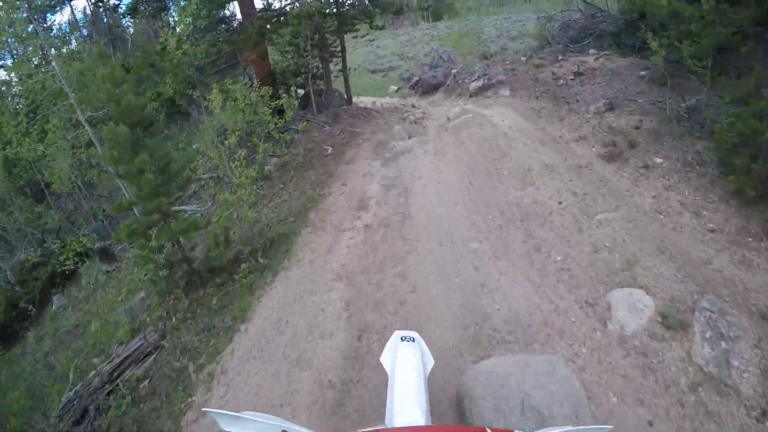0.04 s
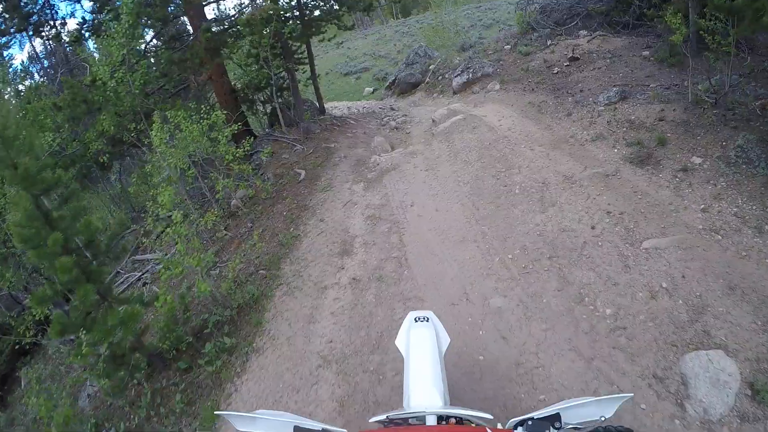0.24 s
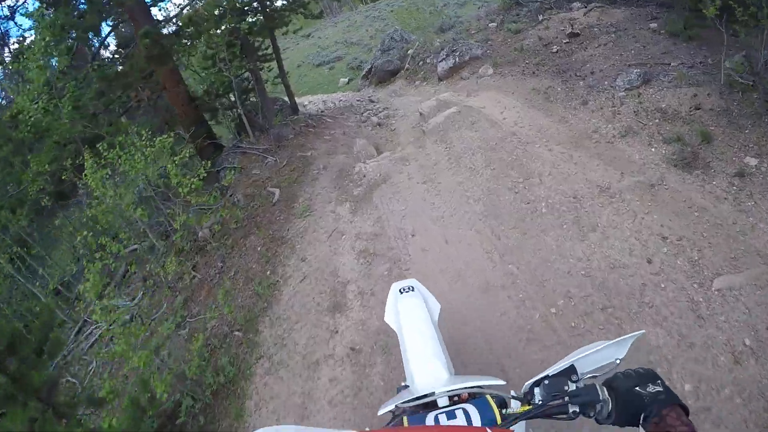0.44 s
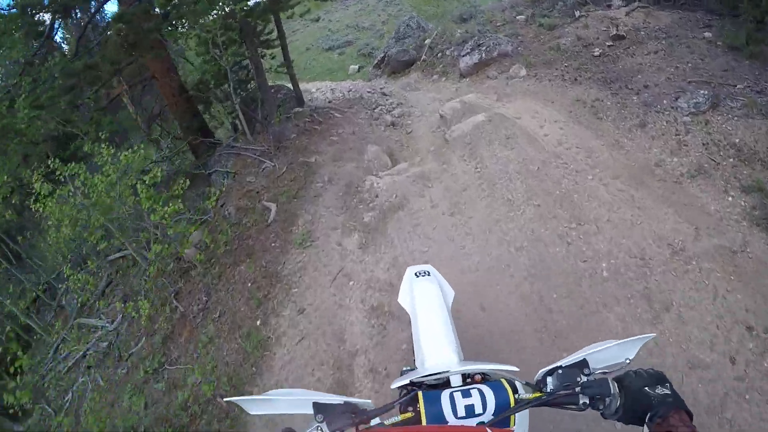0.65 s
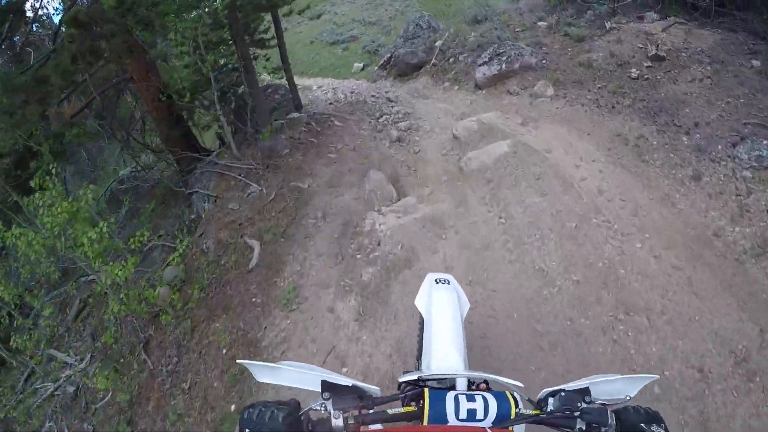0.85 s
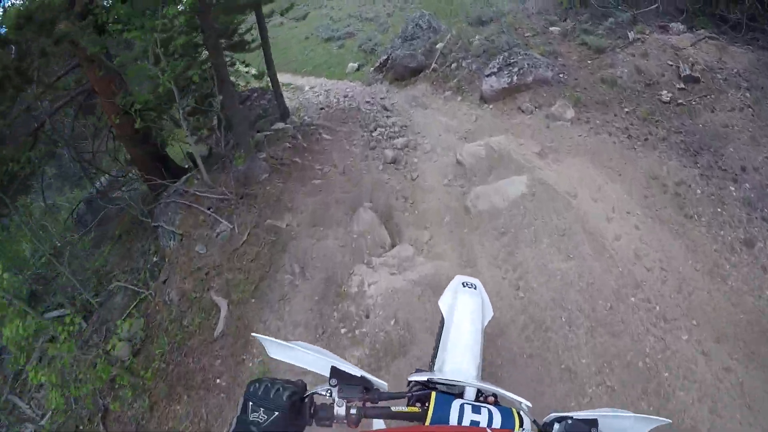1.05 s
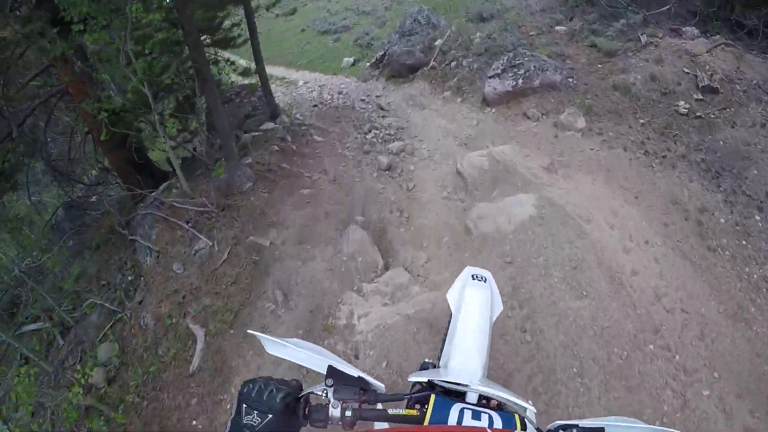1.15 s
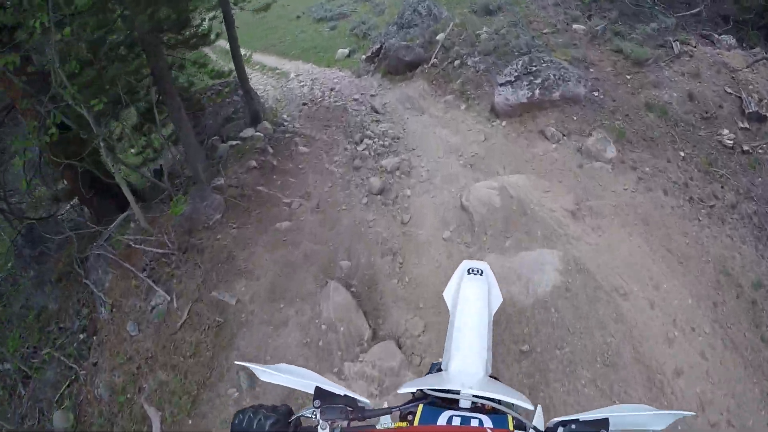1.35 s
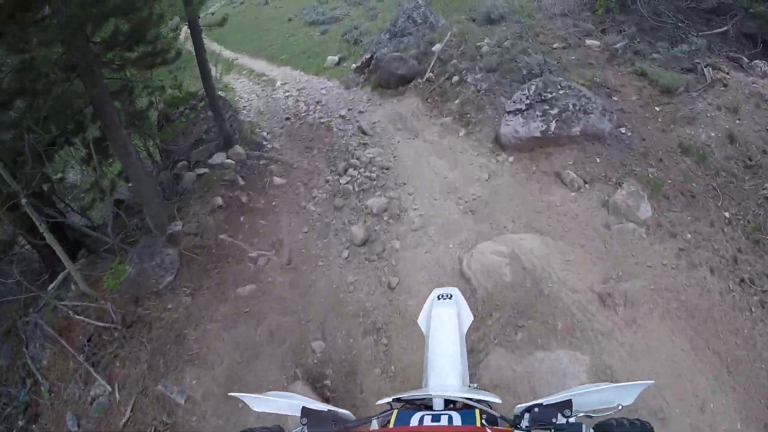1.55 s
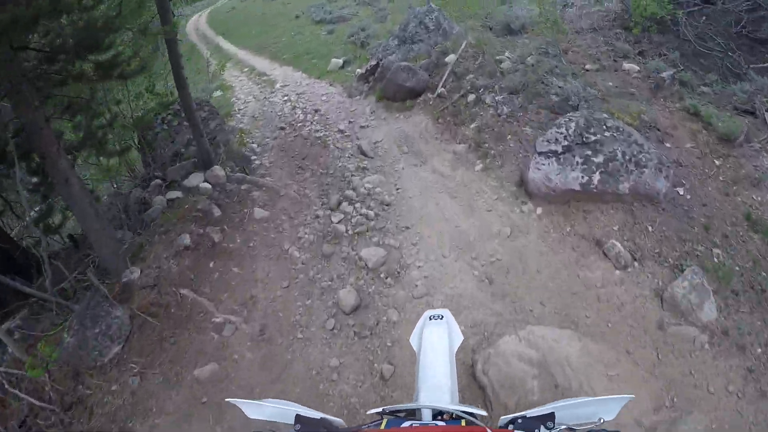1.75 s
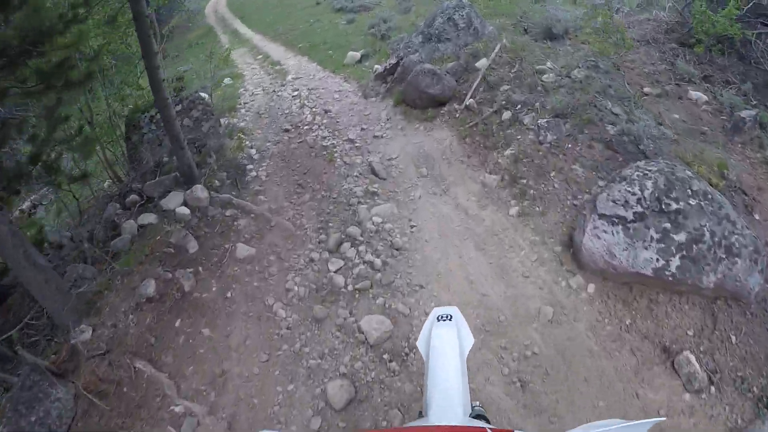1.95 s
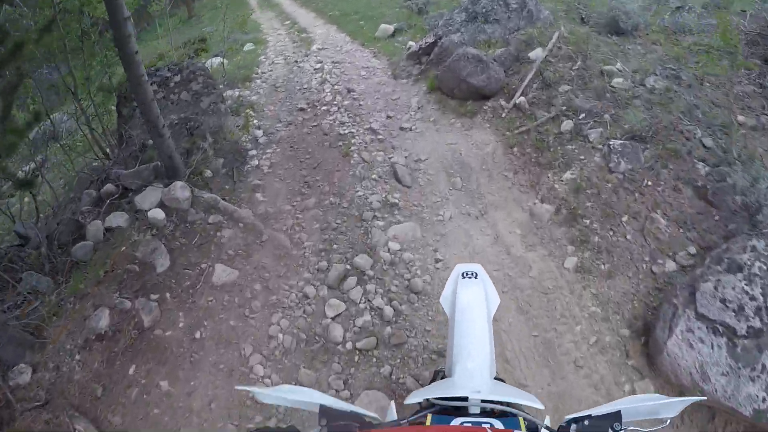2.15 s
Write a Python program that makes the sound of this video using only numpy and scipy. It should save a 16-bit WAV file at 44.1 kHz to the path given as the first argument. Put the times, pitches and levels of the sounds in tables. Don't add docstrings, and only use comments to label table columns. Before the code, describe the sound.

A one-cylinder dirt bike engine putters steadily near idle, with low hum, soft exhaust pops and metallic valve clatter; quick plastic knocks open it, and gravel crunches louder near the end, heard from a helmet-mounted cased microphone.

```python
import sys
import numpy as np
from scipy import signal
from scipy.fft import rfft, irfft
from scipy.io import wavfile

SR = 44100
rng = np.random.default_rng(int(sys.argv[2]) if len(sys.argv) > 2 else 0)


def int16_out(signal):
    q = np.round(np.clip(np.atleast_2d(signal).T, -1, 1) * 32767)
    wavfile.write(sys.argv[1], SR, q.astype(np.int16))


def gain_from_db(level_db):
    decades = np.asarray(level_db, float) / 20
    return 10 ** decades


N = 96711

# (time [s], level [dB])
FACING_ENGINE = [(0, 3.5), (.25, 4), (.5, 2), (.75, 4), (1.0, 0.6), (1.5, 2.25), (1.75, 1), (2.19, 4.2)]
# (time [s], level [dB])
BUFFETING = [(0, -1.), (.12, -1), (.3, 3), (.5, -0.5), (.7, 3.5), (.95, -3.), (1.15, 0.5), (1.4, -2),
             (1.72, 0.5), (1.95, -1.5), (2.19, 2)]


def evened(x):
    return x / np.sqrt(np.mean(x ** 2) + 1e-20)


def curve(rows):
    s, value = np.transpose(rows)
    return np.interp(np.arange(N) / SR, s, value)


def colour(x, points):
    f, db = np.transpose(points)
    hz = np.fft.rfftfreq(len(x), 1 / SR) + 1
    octaves_past_end = np.log2(np.maximum(hz / f[-1], 1))
    gain_db = np.interp(np.log(hz), np.log(f), db) - 11.5 * octaves_past_end
    return evened(irfft(rfft(x) * gain_from_db(gain_db), len(x)))


def drift(rate_hz):
    t = np.arange(N) / SR
    return evened(sum(np.sin(2 * np.pi * (f * t + rng.random())) for f in rate_hz * np.linspace(.1, 1, num=12)))


def ring(x, hz, width_hz):
    r = np.exp(-np.pi * width_hz * 1.5 / SR)
    poles = [1, -2 * r * np.cos(2 * np.pi * hz / SR), r * r]
    once = signal.lfilter([1], poles, x)
    return signal.lfilter([1], poles, once)


def cycles():
    # (time [s], speed [rpm])
    speed = [(0, 2191), (.15, 2110), (.29, 2060), (.44, 2078), (.58, 2081), (.73, 1988), (.88, 2042),
             (1.02, 2050), (1.17, 2003), (1.31, 2009), (1.46, 1995), (1.61, 2013), (1.75, 2012),
             (1.9, 1949), (2.04, 2030), (2.19, 1987)]
    first_cycle = -.5883
    return first_cycle + np.cumsum(curve(speed)) / 120 / SR


def passes(c):
    return np.diff(np.floor(c), prepend=np.floor(c[0]))


def hiss():
    tone = [(3000, 4.5), (6000, -5), (9000, -5.5), (15000, -12)]  # Hz, dB
    return gain_from_db(-66) * colour(rng.standard_normal(N), tone)


def whine():
    return gain_from_db(-83) * evened(ring(rng.standard_normal(N), hz=8575, width_hz=45))


def wind():
    # (frequency [Hz], level [dB per Hz])
    wind_tone = [(8, 1.5), (22, -1.5), (45, -1.5), (100, -4.5), (115, -14), (150, -15.5), (172, -28.5),
                 (430, -29.5)]
    gusts_db = 0.37 * curve(BUFFETING) + 1.2 * drift(5.)
    return gain_from_db(-39.5 + gusts_db) * colour(rng.standard_normal(N), wind_tone)


def gravel():
    # (time [s], level [dB])
    roll = [(0.03, -58), (0.32, -58), (0.45, -52), (0.59, -59), (0.67, -55), (0.88, -66), (1.47, -66.5),
            (1.49, -78.5), (1.5, -69), (1.72, -56), (1.83, -46), (2.0, -48.5), (2.01, -47), (2.19, -54)]
    # (frequency [Hz], level [dB per Hz])
    crunch_tone = [(300, -8), (450, -7.5), (780, -11), (1500, -2), (2030, -7), (2900, -3), (4000, -15),
                   (5500, -38)]
    stones_per_s = 5000 * gain_from_db(1.5 * drift(40.))
    hit = rng.random(N) < stones_per_s / SR
    stones = hit * gain_from_db(2.4 * rng.exponential(1, N))
    steady_roar = 1.3
    crunch, inside = (evened(stones) + steady_roar) * rng.standard_normal((2, N))
    hollow = gain_from_db(-6) * evened(ring(inside, hz=1520, width_hz=170))
    return gain_from_db(curve(roll) + 3) * (colour(crunch, crunch_tone) + hollow)


def knocks():
    # (time [s], level [dB], frequency [Hz], time to fall 60 dB [s])
    jolts = [
        (.0003, -31.5, 726, 0.024),
        (.0005, -38.5, 2367, 0.028),
        (.0024, -27, 1060, 0.012),
        (.0068, -39.5, 2400, 0.022),
        (.0098, -26.5, 1053, 0.012),
    ]
    t = np.arange(N) / SR
    out = np.zeros(N)
    for start, db, hz, t60 in jolts:
        fading = gain_from_db(db - 60 * np.clip(t - start, 0, 1) / t60)
        out += (t > start) * fading * np.sin(2 * np.pi * hz * (t - start))
    return out


def clatter(c):
    # (place in the cycle [share], length [share], level over the steady clatter [dB])
    valves = [
        (.13, .03, 2),
        (.25, .03, 3.2),
        (.57, .04, -3.8),
        (.82, .08, 3),
    ]
    # (frequency [Hz], width [Hz], level [dB])
    casings = [(1107, 53, -10), (2360, 102, -13.5), (2495, 60, -10), (3004, 90, -16.5), (3562, 40, -18),
               (4513, 48, -19.5), (4934, 200, -17.5), (5670, 390, -21), (6850, 290, -29.5)]
    # (frequency [Hz], level [dB per Hz])
    tick_tone = [(350, -33), (600, -6), (790, -11), (1150, -1.5), (2300, 3.5), (3300, -7.5), (4200, -11),
                 (6200, -23.5)]
    bunch_db = .4 * drift(11.0)
    for at, length, db in valves:
        from_event = (c - at + .5) % 1 - .5
        bunch_db = bunch_db + db * np.exp(-.5 * (from_event / length) ** 2)
    ticks_per_s = 6000
    ticks = (rng.random(N) < ticks_per_s / SR) * gain_from_db(1.9 * np.minimum(rng.exponential(1, N), 4))
    strength = gain_from_db(bunch_db) * (evened(ticks) + 1.5)
    bare, struck = strength * rng.standard_normal((2, N))
    rings = sum(gain_from_db(db + 1.3 * drift(8.0)) * evened(ring(struck, hz, width)) for hz, width, db in casings)
    return gain_from_db(-55.5 + curve(FACING_ENGINE)) * (colour(bare, tick_tone) + rings)


def tappet(c):
    strike = passes(c - .8)
    t = np.arange(4000) / SR
    ping = gain_from_db(-60 * t / .06) * np.sin(2 * np.pi * 2245 * t)
    ping *= np.minimum(t / 0.0031, 1)
    spread_db = 4
    force = gain_from_db(-51 + curve(FACING_ENGINE) + spread_db * rng.standard_normal(N))
    return signal.oaconvolve(strike * force, ping)[:N]


def hum(c):
    # (time [s], level [dB])
    hum_level = [(0.02, -31.5), (0.06, -25.5), (0.12, -31.5), (0.33, -23.5), (0.39, -28.5), (0.68, -25.5),
                 (0.71, -24.5), (1.12, -28.5), (1.2, -25), (1.46, -30), (1.5, -27.5), (1.84, -27),
                 (1.91, -37.5), (2.14, -29)]
    lag, wander = .19, .3
    return np.sqrt(2) * gain_from_db(curve(hum_level)) * np.cos(4 * np.pi * (c - lag) + wander * drift(2.27))


def thump(c):
    # (multiple of the firing rate, level [dB])
    parts = [(3, -45), (4, -42.5), (5, -48), (6, -49.5)]
    lag, wander = .33, .3
    shake_db = curve(BUFFETING)
    out = np.zeros(N)
    for multiple, db in parts:
        level = gain_from_db(db + shake_db + 1.3 * drift(5.5))
        out += np.sqrt(2) * level * np.cos(2 * np.pi * multiple * (c - lag) + wander * drift(9.2))
    return out


def puffs(c):
    cycle_s = .059
    since_s = ((c + .06) % 1) * cycle_s
    gas = colour(rng.standard_normal(N), [(150, -24), (200, -4), (340, -2.5), (480, -14)])
    return gain_from_db(-56) * gas * np.minimum(since_s / 0.001, 1) * np.exp(-since_s / 0.014)


def burst(t):
    hz, width_s = 268.7, 0.0031
    return -np.cos(2 * np.pi * hz * t) * np.exp(-.5 * (t / width_s) ** 2)


def pops(c):
    # (frequency [Hz], level [dB], time to fall 60 dB [s])
    silencer = [
        (213.4, 0.5, 0.066),
        (336, -10, .07),
    ]
    fire = passes(c) * gain_from_db(-43.5 - 0.5 * rng.standard_normal(N))
    t = np.arange(-4000, 4001) / SR
    echo_s = .0146
    pop = burst(t) + gain_from_db(-14) * burst(t - echo_s)
    swell_in = np.clip(.5 + t / 0.0062, 0, 1)
    for hz, db, t60 in silencer:
        pop -= gain_from_db(db - 60 * abs(t) / t60) * np.cos(2 * np.pi * hz * t) * swell_in
    return signal.oaconvolve(fire, pop, "same")


def scene():
    c = cycles()
    surroundings = whine() + wind() + gravel() + knocks()
    engine = clatter(c) + tappet(c) + hum(c) + thump(c) + puffs(c) + pops(c)
    return (surroundings + engine)[None]


def top_cut(x):
    return signal.sosfilt(signal.butter(12, 15290, fs=SR, output="sos"), x)


def record(dry):
    mix = dry + hiss()
    return top_cut(mix)


dry = scene()
out = record(dry)
int16_out(out)
```